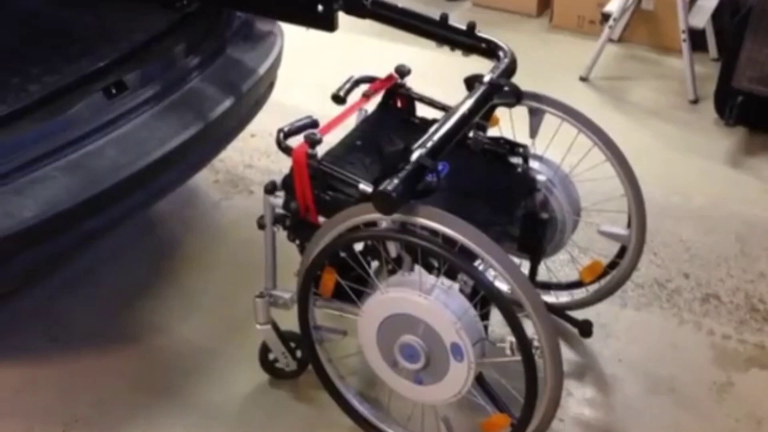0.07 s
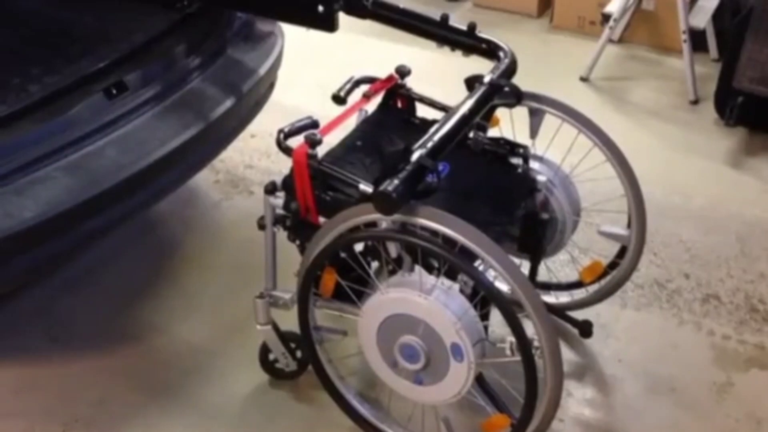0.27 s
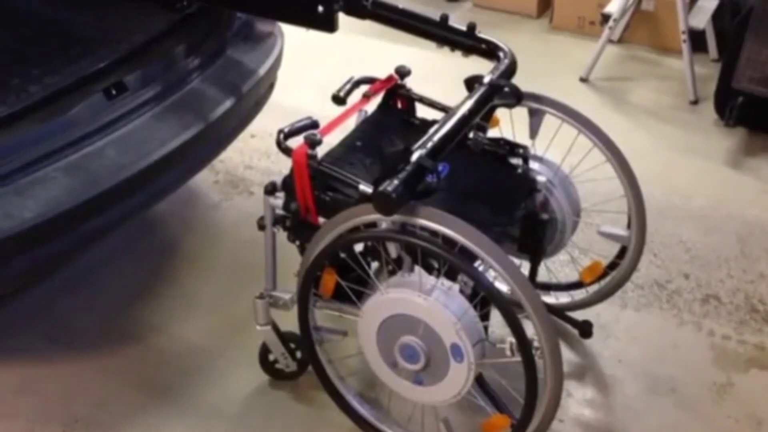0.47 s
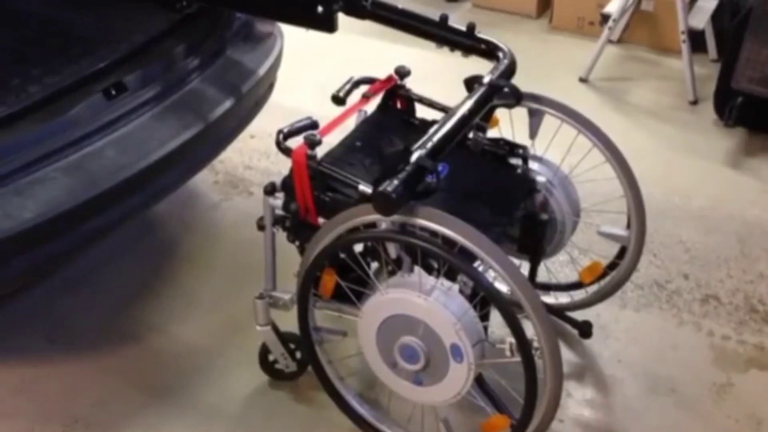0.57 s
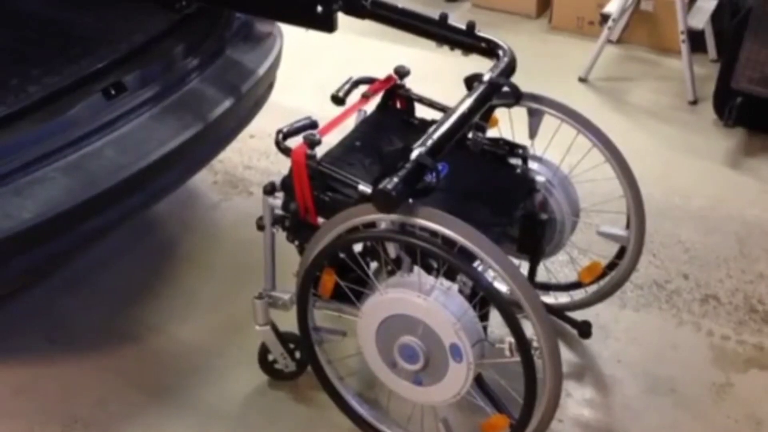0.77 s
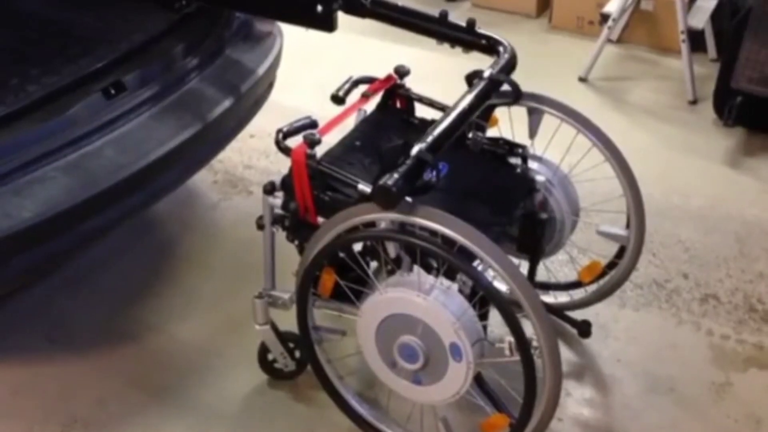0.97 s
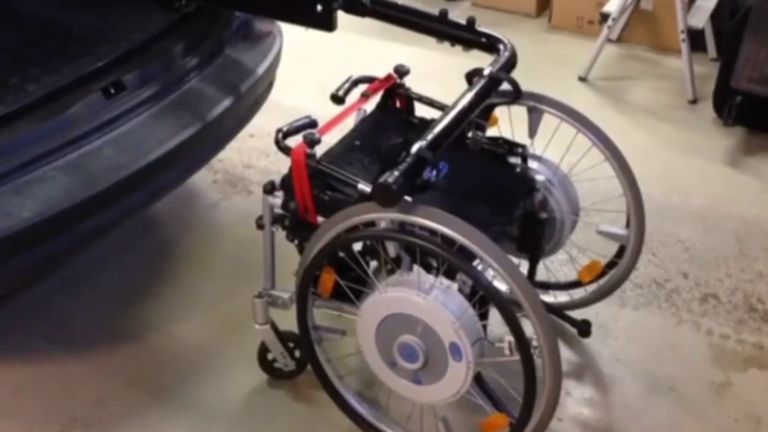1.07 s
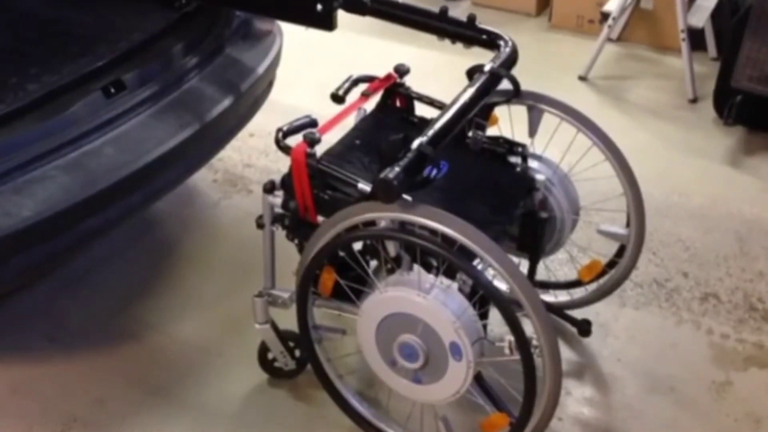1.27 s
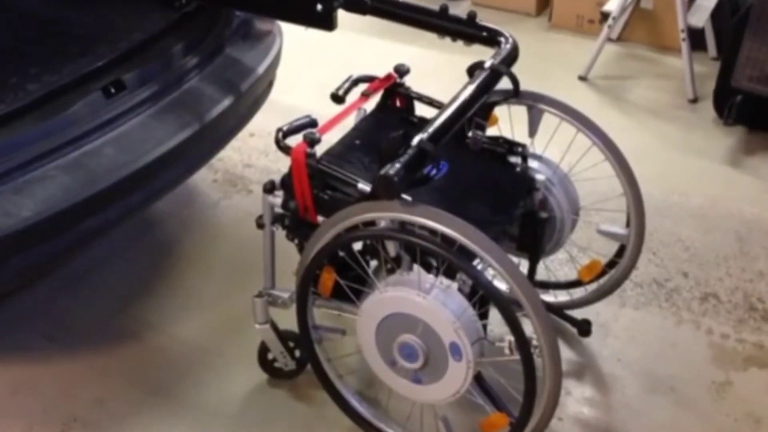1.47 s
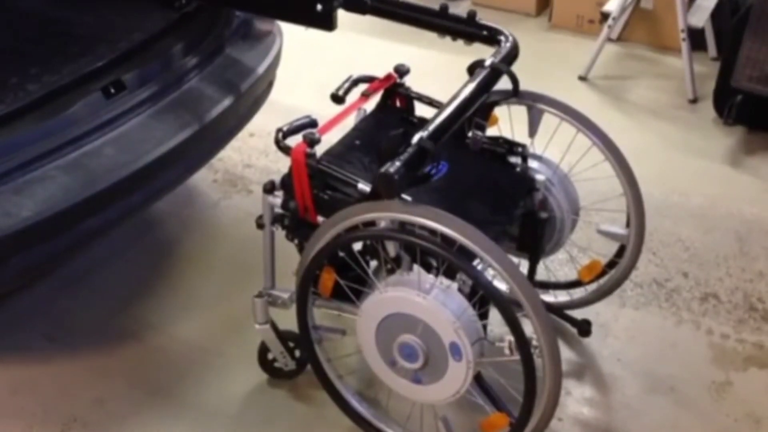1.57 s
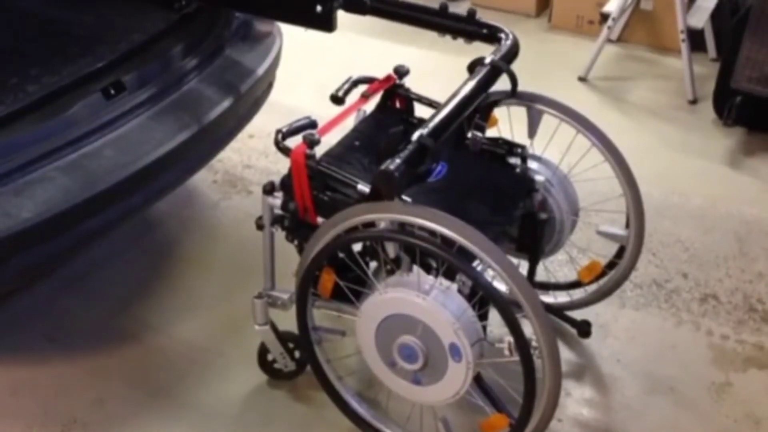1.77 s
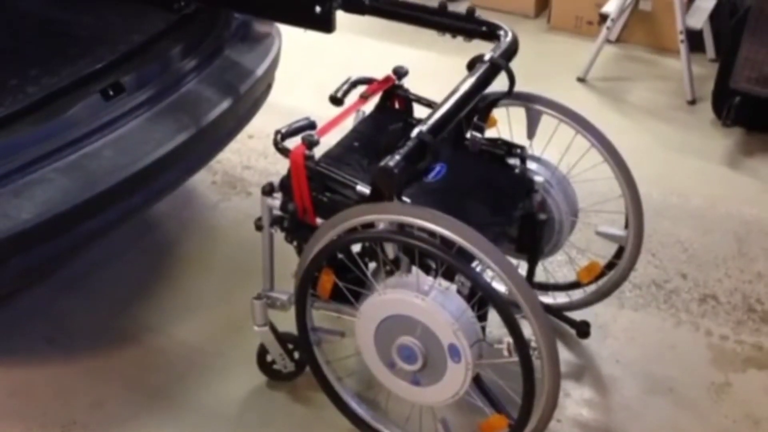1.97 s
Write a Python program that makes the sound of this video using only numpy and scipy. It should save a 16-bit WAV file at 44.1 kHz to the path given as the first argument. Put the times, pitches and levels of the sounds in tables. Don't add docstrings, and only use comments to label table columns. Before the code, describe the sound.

A geared lift motor, heard close in a garage with a short reverberation; after a quiet wait a hard metallic clack releases it, and it whirrs with a slightly pulsing whine until the end.

```python
import sys
import numpy as np
from scipy import signal
from scipy.fft import rfft, irfft
from scipy.io import wavfile
from scipy.ndimage import uniform_filter1d

SR = 44100
rng = np.random.default_rng(int(sys.argv[2]) if len(sys.argv) > 2 else 0)


def how_loud(loudness_db):
    steps = np.asarray(loudness_db, float) / 20
    return 10 ** steps


def wav_out(sig):
    wavfile.write(sys.argv[1], SR, np.round(np.clip(np.atleast_2d(sig).T, -1, 1) * 32767).astype(np.int16))


N = 89126
TIME = np.arange(N) / SR
START_S, HISS_START_S, SWITCH_S = .09, .155, .602
HISS_TOP_HZ = 10950


def rms_one(x):
    return x / np.sqrt(np.mean(x ** 2) + 1e-20)


def drift(rate_hz):
    r = np.exp(-2 * np.pi * rate_hz / SR)
    wander = signal.lfilter([1], [1, -2 * r, r * r], rng.standard_normal(N + SR))
    return rms_one(wander[SR:])


def ring(x, hz, t60_s):
    r, w = how_loud(-60 / (t60_s * SR)), 2 * np.pi * hz / SR
    return signal.lfilter([0, np.sin(w)], [1, -2 * r * np.cos(w), r * r], x + 1e-18)


def band(x, lo_hz, hi_hz, order=2):
    return signal.sosfilt(signal.butter(order, [lo_hz, hi_hz], "band", fs=SR, output="sos"), x)


def coloured(points, patchy_db):
    hz, db = np.transpose(points)
    edges = 25 * 2 ** (np.arange(28) / 3)
    white = rng.standard_normal((2, N))
    out = 0
    for k, (lo, hi) in enumerate(zip(edges, edges[1:])):
        centre_db = np.interp(np.log(lo * hi) / 2, np.log(hz), db)
        out = out + how_loud(centre_db + patchy_db * drift(24)) * band(white[k % 2], lo, hi)
    return rms_one(out)


def click(s, db):
    out = np.zeros(N)
    out[int(s * SR)] = how_loud(db)
    return out


# frequency_hz, density_db_per_hz
FLOOR_SPECTRUM = [(30, -26), (75, -6), (105, -20.5), (160, -3.5), (400, -4.5), (620, -10.5), (2000, -15),
                  (8500, -19)]


def room_floor():
    hum_level = how_loud(-77 + 5 + .8 * drift(6.3))
    swell = np.clip((TIME - START_S) / HISS_START_S, 0, 1)
    hum = hum_level * np.sin(2 * np.pi * 100 * TIME) * swell
    return how_loud(-65) * coloured(FLOOR_SPECTRUM, 0.91) + hum


def garage(x):
    t60_s, gap_s, level_db = .3, .006, -13
    t = np.arange(SR // 2) / SR
    tail = band(rng.standard_normal(len(t)), 180, 8600, order=1) * how_loud(-60 * t / t60_s) * (t > gap_s)
    return how_loud(level_db) * signal.fftconvolve(x, tail / np.sqrt(np.sum(tail ** 2)))[:N]


# start_s, level_db, pitch_hz
KNOCK_EVENTS = [(.141, -75.5, 233.4), (.626, -59, 401.7), (.63, -64, 271), (.634, -65.5, 154),
                (0.702, -64, 260.4), (0.864, -62.5, 294), (1.182, -68.5, 287), (1.409, -68.5, 195),
                (1.434, -62, 290), (1.725, -65.5, 150), (1.724, -66, 295)]


def knocks():
    t60_s, gain_db = .2, 14
    soft = 0
    for s, db, hz in KNOCK_EVENTS:
        blow = band(click(s, db + gain_db), hz / 2, hz * 2, order=1)
        soft = soft + ring(blow, hz, t60_s)
    return soft + band(click(.1412, -70), 900, 7000, order=1)


# pitch_hz, level_db, t60_s
RELAY_MODES = [(2100, -45, .006), (4200, -43, .006), (6200, -49, .004), (8000, -42, .005),
               (7100, -47, .004)]


def relay():
    gap_s = .0006
    return sum(ring(click(SWITCH_S, db) + click(SWITCH_S + gap_s, db), hz, t60_s)
               for hz, db, t60_s in RELAY_MODES)


# start_s, level_db
CLACK_EVENTS = [
    (.6070, -41),
    (.6128, -25),
    (.6152, -21),
    (.6183, -25),
    (.6210, -30),
    (.6240, -28),
    (.6275, -30),
    (.637, -34),
    (.644, -37),
]
# pitch_hz, level_db, t60_s
BRAKE_MODES = [(620, -15, .04), (845, -14, .04), (1227, -14, .03), (1475, -4, .03), (1857, -.5, .045),
               (2250, -5, .025), (2700, -11, .015), (3050, -11, .015), (3531, -9, .015), (4250, -12, .012),
               (4829, -12, .012), (5690, -17, .01), (6514, -17, .01)]


def brake():
    gain_db, chance_db, soft_hz = -4, 1.5, 7100
    chance = rng.normal(0, chance_db, (len(CLACK_EVENTS), len(BRAKE_MODES)))
    out = 0
    for k, (hz, db, t60_s) in enumerate(BRAKE_MODES):
        blows = sum(click(s, level + db + gain_db + c) for (s, level), c in zip(CLACK_EVENTS, chance[:, k]))
        out = out + (-1) ** k * ring(band(blows, 260, soft_hz), hz, t60_s)
    return out


def rotation():
    mesh_hz, first_mesh_hz, runup_at_s, runup_tau_s = 282, 251, .68, .075
    since = np.maximum(TIME - runup_at_s, 0)
    lag = (1 - first_mesh_hz / mesh_hz) * np.exp(-(since / runup_tau_s) ** 2)
    turns = np.cumsum(mesh_hz * (1 - lag) * (1 + .0025 * drift(8))) / SR
    shaft = np.cos(2 * np.pi * (turns - turns[int(1.097 * SR)]) / 18)
    drum = np.cos(2 * np.pi * (TIME - .84) / .298) * np.clip(1 - 20 * lag, 0, 1)
    engaged = np.clip((TIME - runup_at_s) / .008, 0, 1)
    return turns, lag, shaft, drum, engaged


# level_db, flutter_db, swing_per_drum_turn_db, swing_per_shaft_turn_db
MESH_TONES = [(-71, 3, 3, .3), (-56, 2, 4.5, .3), (-62.5, 3, 3, .3), (-52.5, 1, .3, .3), (-48, 1.5, .3, 1),
              (-55, 2.5, .3, .3), (-58, 1.5, .3, .3), (-60, 3, .3, 1.2), (-54, 2.5, 2.5, .3),
              (-53.5, 2.5, 2.5, .3), (-63, 3, .3, .3), (-62, 3, .3, .3), (-72, 3, .3, 3),
              (-62.5, 3, 1.5, 5)]
MESH_ORDERS = [1.01, 1.984, 3, 135 / 36, 4, 150 / 36, 153 / 36, 5, 206 / 36, 218 / 36, 272 / 36, 293 / 36,
               16, 20]


def gear_mesh(turns, lag, shaft, drum):
    high_loss_db, take_up_db = 17, 45
    out = 0
    for k, (db, flutter, by_drum, by_shaft) in zip(MESH_ORDERS, MESH_TONES):
        take_up = take_up_db * lag * (1 if abs(k - round(k)) < 1 / 18 else -1)
        level = db + 2 + flutter * drift(12) + by_drum * drum + by_shaft * shaft
        level = level - high_loss_db * max(k - 5, 0) * lag + take_up
        out = out + how_loud(level) * np.sin(2 * np.pi * (k * turns + rng.random()))
    return out


# pitch_hz, width_hz, level_db
HOUSING_MODES = [(1215, 150, -2.5), (1733, 200, 0.5), (1860, 68, -6), (2164, 120, -2), (2651, 104, -8.5),
                 (3084, 130, -12), (3360, 130, -16), (3565, 130, -11), (3940, 47, -4), (4660, 20, -2),
                 (5580, 50, -10), (6740, 57, -18.5), (7230, 71, -10), (8084, 170, -11)]


def housing_rattle(turns):
    hits_per_s, spread_db, repeat_share = 4000, 4.1, .41
    wheel_teeth, pattern_hits = 36, 500
    sizes = how_loud(spread_db * np.minimum(rng.exponential(1, N), 5)) * rng.choice([-1, 1], N)
    place = (turns / wheel_teeth * pattern_hits).astype(int)
    faults = np.diff(place, prepend=0) * sizes[place % pattern_hits]
    chance = sizes * (rng.random(N) < hits_per_s / SR)
    hits = np.sqrt(repeat_share) * rms_one(faults) + np.sqrt(1 - repeat_share) * rms_one(chance)
    out = 0
    for hz, wide_hz, db in HOUSING_MODES:
        out = out + how_loud(db) * np.sqrt(wide_hz) * rms_one(ring(hits, hz, 3.94 / wide_hz))
    return rms_one(out)


def scrape(shaft, drum):
    rub = band(rng.standard_normal(N), 2780, 4870)
    return rms_one(rub * np.exp(1.3 * shaft) * how_loud(3.4 * drum + 2 * drift(12)))


# frequency_hz, density_db_per_hz
WHIRR_SPECTRUM = [(120, -54.5), (700, -34), (1050, 0), (1750, 2.9), (2300, -4), (2900, -18.5), (4000, -12),
                  (8200, -11)]
# time_s, level_db
MOTOR_EFFORT = [(.6, 0.5), (.65, -2), (.7, -0.5), (.9, -1.3), (1.2, -0.47), (1.5, -0.7), (1.65, 0),
                (1.8, -1.2), (2.02, 0.36)]


def motor():
    turns, lag, shaft, drum, engaged = rotation()
    tonal = gear_mesh(turns, lag, shaft, drum) + how_loud(-56) * scrape(shaft, drum)
    noise = how_loud(-45) * housing_rattle(turns) + how_loud(-41.5) * coloured(WHIRR_SPECTRUM, 1.75)
    on = np.clip((TIME - SWITCH_S) / .012, 0, 1)
    return how_loud(np.interp(TIME, *np.transpose(MOTOR_EFFORT))) * (engaged * tonal + on * noise)


def scene():
    blows = relay() + brake() + knocks()
    low_cut = signal.butter(4, 138, "high", fs=SR, output="sos")
    hoist = signal.sosfilt(low_cut, motor() + blows + garage(blows))
    notch_hz, notch_wide_hz = 7380, 150
    hoist = signal.lfilter(*signal.iirnotch(notch_hz, notch_hz / notch_wide_hz, SR), hoist)
    return (hoist + room_floor())[None]


def thin_out(x):
    edge_hz, low_edge_hz, low_edge_share = 8500, 8170, .25
    sliver_share, sliver_db, top_closes_s = .64, -6, .63
    hz, s, cells = signal.stft(x, SR, nperseg=2048, noverlap=1024)
    power, hz = np.abs(cells) ** 2, hz[:, None]
    nearby = uniform_filter1d(power, size=5, axis=0)
    around = uniform_filter1d(power, size=61, axis=0)
    weak = nearby < how_loud(2 * -4.6) * around
    gain = np.where(weak & (hz > 2400), how_loud(-16), 1.)
    luck = np.repeat(rng.random((2, len(s))), 2, axis=1)[:, :len(s)]
    edge = np.where(luck[0] < low_edge_share, low_edge_hz, edge_hz)
    sliver = (hz > 8830) * (hz < 9030) * (luck[1] < sliver_share) * how_loud(sliver_db)
    slope = how_loud(-3 - 14 * (hz - edge_hz) / 1000)
    quiet = slope * (hz < HISS_TOP_HZ) * (s > HISS_START_S)
    top = np.where(s < top_closes_s, quiet, sliver)
    return signal.istft(cells * np.where(hz < edge, gain, top), SR, nperseg=2048, noverlap=1024)[1][:N]


def band_limit(x):
    return signal.sosfilt(signal.butter(12, 11000, fs=SR, output="sos"), x)


def record(dry):
    hz = np.fft.rfftfreq(N, 1 / SR)
    hiss = irfft(rfft(rng.standard_normal(N)) * (hz < HISS_TOP_HZ), N)
    hiss = rms_one(hiss) * (TIME > HISS_START_S)
    fade = np.clip((TIME[-1] - TIME) / .003, 0, 1)
    mix = (thin_out(dry[0]) + how_loud(-77) * hiss) * (TIME > START_S) * fade
    return band_limit(mix[None])


dry = scene()
out = record(dry)
wav_out(out)
```